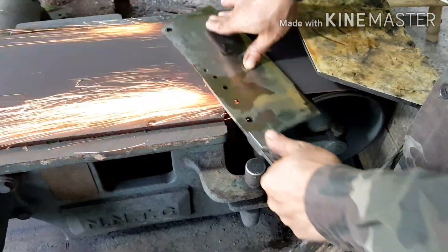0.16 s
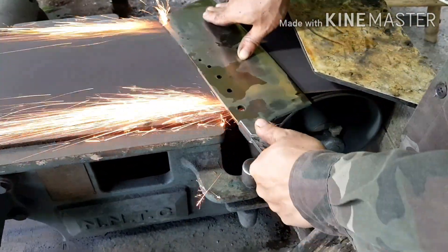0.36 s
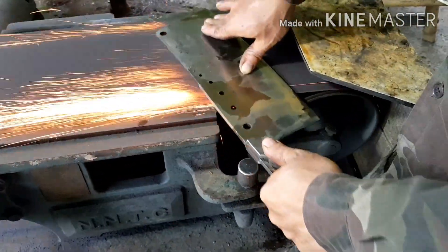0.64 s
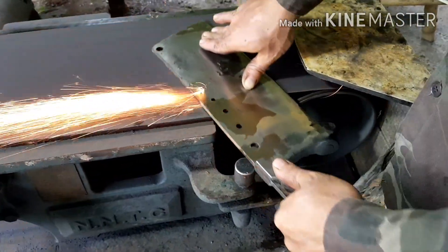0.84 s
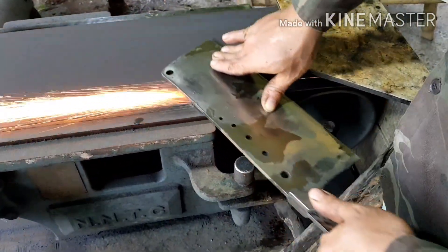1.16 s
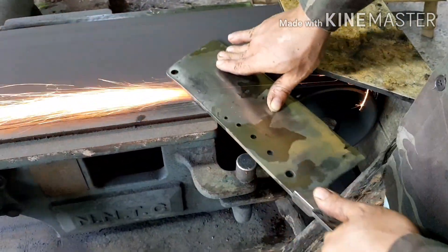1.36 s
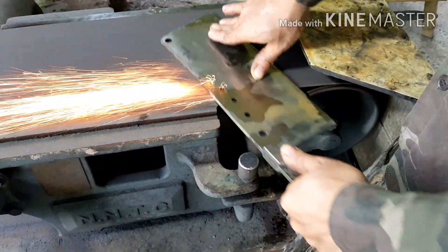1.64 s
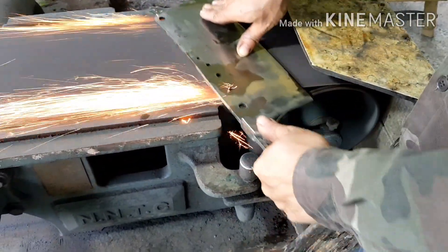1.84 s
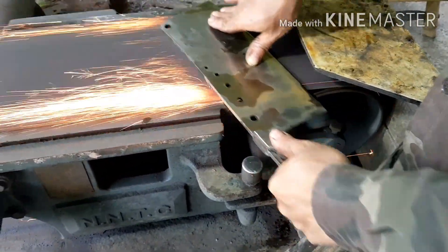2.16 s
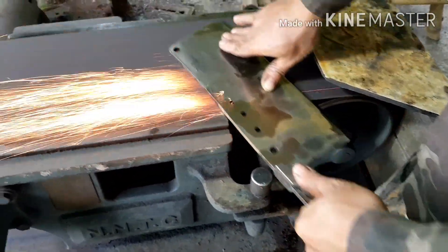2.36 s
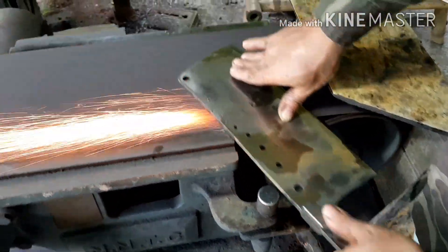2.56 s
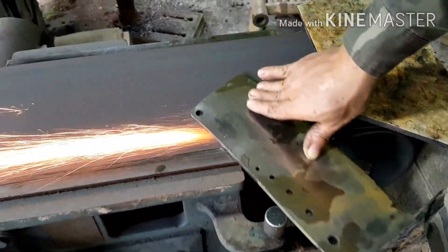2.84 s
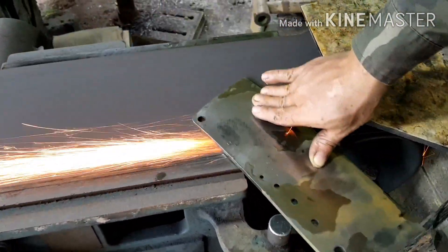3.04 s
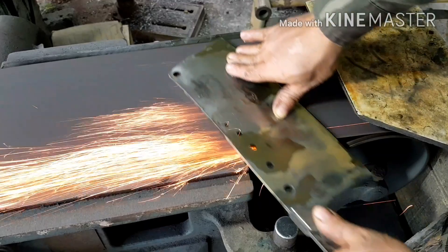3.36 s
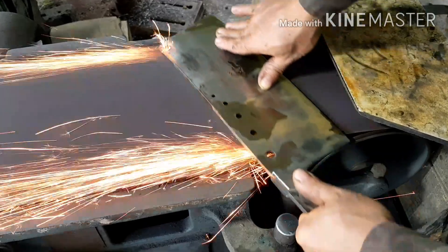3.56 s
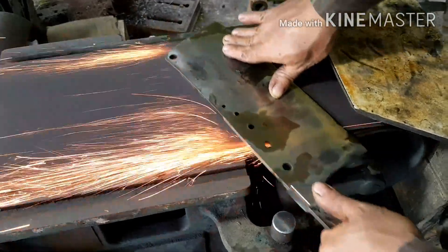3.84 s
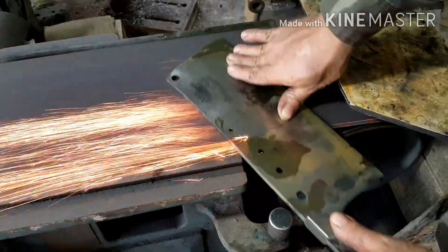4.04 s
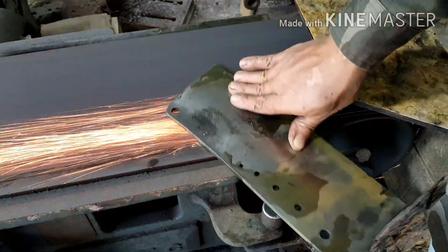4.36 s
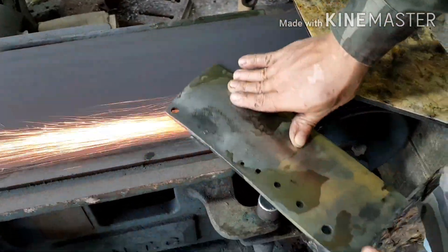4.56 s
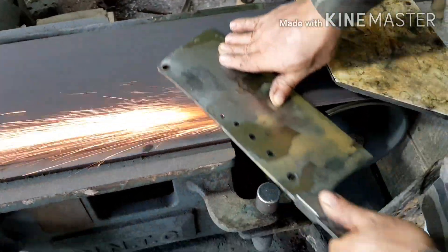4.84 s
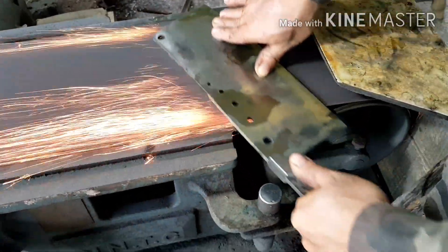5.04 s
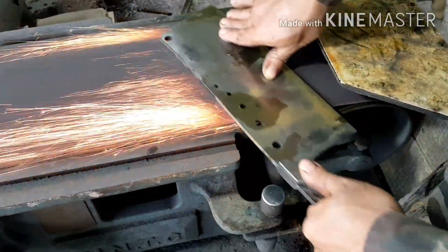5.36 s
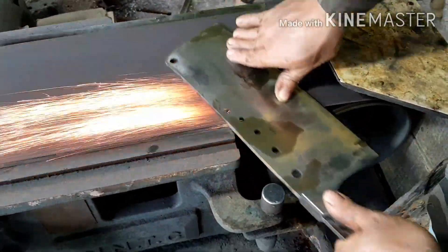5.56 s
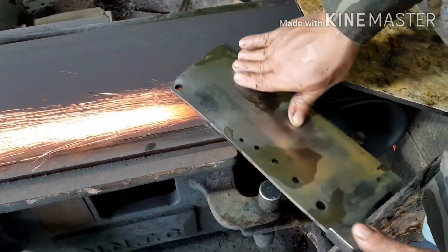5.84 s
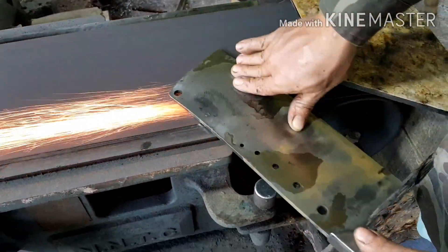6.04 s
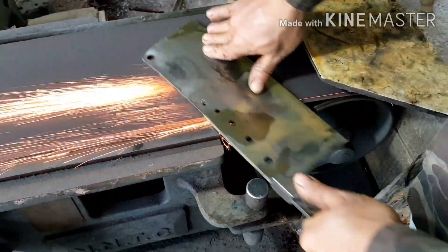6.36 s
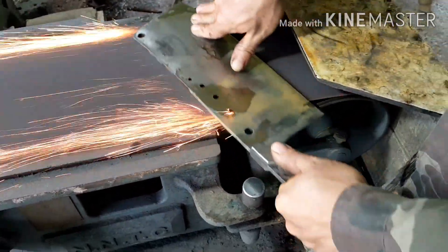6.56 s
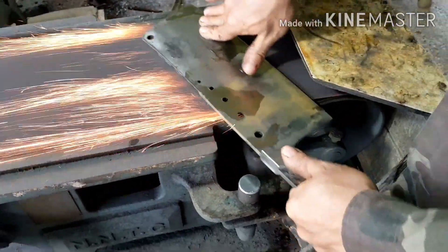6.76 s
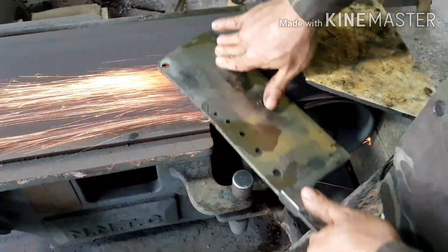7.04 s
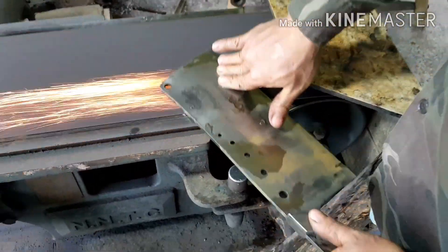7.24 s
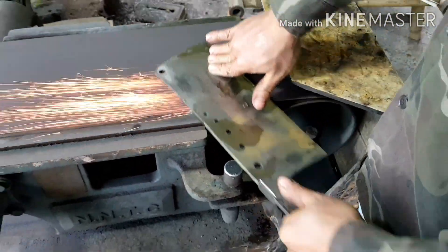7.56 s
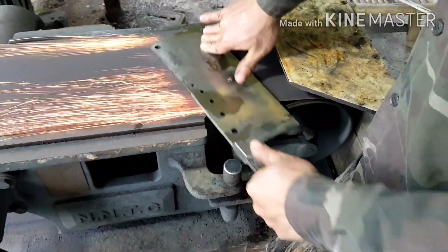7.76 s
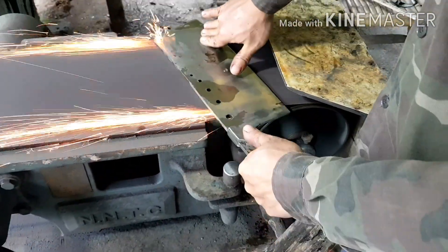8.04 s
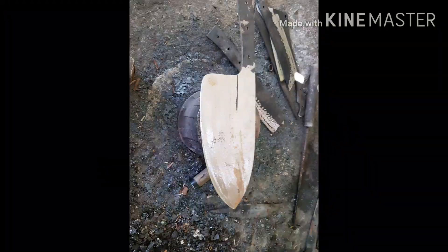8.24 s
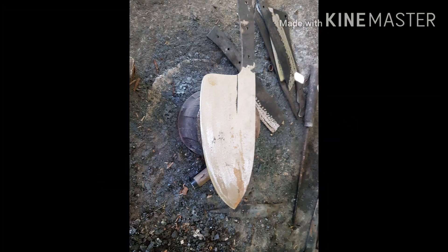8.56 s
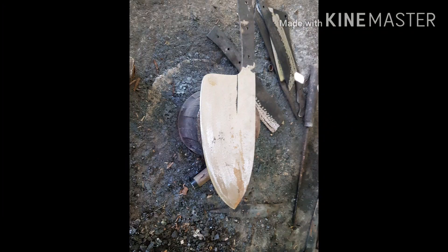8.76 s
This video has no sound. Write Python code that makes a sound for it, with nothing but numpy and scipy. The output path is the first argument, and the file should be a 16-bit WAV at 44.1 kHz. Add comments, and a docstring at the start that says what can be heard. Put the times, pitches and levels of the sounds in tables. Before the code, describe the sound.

A steel blade is stroked over a running belt grinder, alternating bright ringing screech and lower roar above steady machine hum, then everything stops dead.

```python
"""In a workshop, close to a pair of microphones, a steel blade is stroked over a grinder's running belt. It
starts with the flat down, screeching and ringing; the tip then makes the machine roar, and so to and fro.
Filtered noise, partly repeated at each turn of the drive wheel, makes the scrape throb 16 times a second.
Resonances ring and squeal; sines hum and drone below. Late on a low note groans; then the sound stops dead."""
import sys
import numpy as np
from scipy import signal
from scipy.fft import rfft, irfft, next_fast_len
from scipy.io import wavfile
from scipy.ndimage import map_coordinates

SR = 44100
rng = np.random.default_rng(int(sys.argv[2]) if len(sys.argv) > 2 else 0)


def log_audio(samples):
    """Write samples as a 16-bit WAV file to the path given in sys.argv[1]."""
    # one column per channel
    frames = np.atleast_2d(samples).T
    # limit to full scale, then quantise
    limited = np.clip(frames, -1, 1)
    pcm = np.round(limited * 32767).astype(np.int16)
    wavfile.write(sys.argv[1], SR, pcm)


N = 392483
TIME = np.arange(N) / SR  # seconds
SIZE = next_fast_len(N + 4096, real=True)
FREQ = np.fft.rfftfreq(SIZE, 1 / SR)  # Hz

# Scrape of the tip at the belt. Each row: frequency in Hz, relative density in dB per Hz.
TIP_SCRAPE = [(400, -30), (900, -10.5), (1300, 1), (1800, 0), (2250, 0), (3000, 0.5), (4000, 0.5),
              (5000, -1), (6300, -2.5), (7000, -5), (7800, -11.5), (9000, -10.5), (16000, -39.5)]
# Scrape of the flat at the belt. Each row: frequency in Hz, relative density in dB per Hz.
FLAT_SCRAPE = [(400, -29.5), (850, -21), (1150, 0), (1900, 0), (2400, -0.5), (3300, -1.1), (4400, -0.5),
               (5300, -3), (6200, -7), (7100, -11), (7700, -23), (9000, -15.5), (16000, -35)]
# Ringing of the blade lying flat. Each row: frequency in Hz, width in Hz, relative level in dB.
BLADE = [(1385, 71, -13.5), (1605, 18, -24), (1842, 50, -15.7), (2020, 130, -16), (2285, 25, -23.5),
         (2590, 130, -18.5), (3048, 28, -21.5), (3283, 120, -20.5), (3570, 45, -18.5), (3827, 50, -18.5),
         (4620, 110, -16.2), (5830, 71, -16.5), (6040, 53, -18), (7020, 70, -24), (8430, 40, -20),
         (10040, 40, -24), (11630, 22, -20), (14810, 25, -20.5)]
# Which side the lying blade beams each pitch to. Each row: frequency in Hz, left minus right in dB.
BEAM = [(900, 3.5), (1300, 3), (1800, 0.5), (2250, 2.5), (3300, -1), (4000, -1.5), (4600, -3.5), (5200, -1),
        (6500, -.5), (8000, 6), (9500, -0.5)]
# Where the scrape lies between the microphones. Each row: time in seconds, left minus right in dB.
SCRAPE_SIDE = [(0.0, -6.0), (1.44, -2.0), (1.72, -3.5), (6.08, -4.0), (6.98, 0.0), (8.22, -1.5)]
# The hand bears down on the lying blade. Each row: start in seconds, end in seconds, extra scrape in dB.
PUSHES = [(-0.04, 0.46, 4.6), (0.43, 0.72, 1.9), (1.53, 1.76, 1.5), (1.73, 2.04, 3.6), (3.26, 3.42, 7.2),
          (3.38, 3.64, 6.3), (3.55, 3.82, 3), (3.9, 4.1, 1.2), (4.84, 5.06, 3.2), (5.0, 5.26, 5.6),
          (6.27, 6.66, 3.7), (7.68, 7.86, 1.3)]
# Hiss of the grit. Each row: frequency in Hz, relative density in dB per Hz.
HISS = [(2000, -29.5), (6000, -8.5), (7200, -8), (7800, -12), (8800, -5), (10000, -.5), (11800, 1.5),
        (13000, 0), (14200, -2), (15500, -2.5)]
# How loud the grit hisses. Each row: time in seconds, level in dB.
HISS_LEVEL = [(0, -26.0), (0.42, -29.5), (0.66, -25.0), (1.3, -31.5), (1.46, -25.0), (2.2, -23.3),
              (2.6, -26.5), (3.1, -22.5), (3.24, -25.5), (3.36, -21.3), (3.46, -23), (3.54, -20.3),
              (3.74, -26.0), (4.24, -29.5), (4.56, -28.0), (4.7, -33.0), (4.92, -26.0), (5.44, -26.3),
              (5.76, -30.0), (6.46, -24.5), (6.98, -26.0), (7.12, -24.5), (7.36, -26.0), (8.22, -27.0)]
# Lower sizzle of a deep cut. Each row: frequency in Hz, relative density in dB per Hz.
SIZZLE = [(2500, -28), (5200, -2), (6500, 0), (8000, 0), (9000, -3), (12000, -20)]
SIZZLE_DB, SIZZLE_PER_HISS = -42, 2.4  # dB at the average hiss; dB per dB of hiss
RING_PER_SCRAPE, FULL_RING_DB = .2, -21  # dB of ringing per dB of scrape; scrape in dB for full ringing
BLADE_DRIFT = .0012  # share by which its resonances move as the contact slides
PUSH_LEAN = .3  # dB that the scrape leans to the right for each dB of push


def blade(force):
    """Grit tears at the steel; the more of it lies on the belt, the harder it chatters and rings."""
    roar_db, hiss_db = follow(ROAR_LEVEL), follow(HISS_LEVEL)
    push_db = sum(db * swell(start, end) for start, end, db in PUSHES)
    scrape_db = scraping(roar_db, hiss_db, push_db)
    flat = 1 / (1 + np.exp((roar_db + 9.0 - scrape_db) / 1.5))  # 0 on the tip, 1 lying flat

    bite_db = (.7 + 1.15 * flat) * force + .55 * wander(12)
    bite = amp(bite_db) * (1.5 + 0.33 * grit(per_s=160, spread_db=2.0))
    drive = unit(friction(memory=.85, repeat=0.54) * bite)

    modes = 0
    for hz, width, db in BLADE:
        modes += amp(db + 1.8 * wander(6)) * ring(drive, hz, width, BLADE_DRIFT)
    modes *= amp(RING_PER_SCRAPE * np.minimum(scrape_db - FULL_RING_DB, 0))
    lying = amp(-1.64) * colour(drive, FLAT_SCRAPE) + amp(-1.3) * modes
    lying = irfft(rfft(lying, SIZE) * pan(spectrum(BEAM)), SIZE)[:, :N]
    tip = amp(1.7) * colour(friction(memory=.8, repeat=.4) * bite, TIP_SCRAPE)
    scrape = np.sqrt(flat) * lying + np.sqrt(1 - flat) * tip
    scrape = shifting(scrape, patchy_db=2.1, span_s=.17, span_hz=59.9)
    scrape = amp(scrape_db) * snagging() * scrape

    hiss = colour(rng.standard_normal((2, N)) * bite ** 0.69, HISS)
    hiss = amp(hiss_db) * shifting(hiss, patchy_db=3.0, span_s=.09, span_hz=59.8)
    sizzle_db = SIZZLE_DB + SIZZLE_PER_HISS * (hiss_db - hiss_db.mean())
    sizzle = amp(sizzle_db) * colour(rng.standard_normal((2, N)) * bite, SIZZLE)
    side_db = follow(SCRAPE_SIDE) - PUSH_LEAN * push_db
    return pan(side_db) * scrape + pan(-.3) * (hiss + sizzle)


# Spans of stronger scrape: the flat on the belt, or, in the light rows, mostly the tip.
# Each row: start in seconds, end in seconds, scrape in dB before the push of the hand.
CONTACTS = [(-0.07, 0.86, -24.8), (1.44, 2.12, -24.5), (2.03, 3.16, -27.3), (3.19, 4.17, -22.5),
            (4.78, 5.54, -26.5), (5.76, 6.02, -30), (6.22, 7.12, -21.8), (7.6, 8.36, -24.5)]
# The tip scrapes all the time, rising with the roar and the hiss (dB at their averages; dB per dB).
TIP_DB, TIP_PER_ROAR, TIP_PER_HISS = -27.0, .36, .6


def scraping(roar_db, hiss_db, push_db):
    """Level of the scrape in dB: the steady tip, plus the spans of stronger scrape."""
    tip_db = TIP_DB + TIP_PER_ROAR * (roar_db - roar_db.mean())
    tip_db += TIP_PER_HISS * (hiss_db - hiss_db.mean())
    stronger = sum(amp(db) * contact(start, end) for start, end, db in CONTACTS)
    return 20 * np.log10(np.hypot(amp(tip_db), amp(push_db) * stronger))


def contact(start, end):
    """A span of stronger scrape sets in, stays and lets go in straight lines: 0 to 1."""
    rise_s, fall_s = .1, .12  # seconds
    return np.clip(np.minimum((TIME - start) / rise_s, (end - TIME) / fall_s), 0, 1)


# The edge snags on the belt and the blade jumps with a short rasp.
# Each row: start in seconds, peak gain in dB.
SNAGS = [(0.099, 3), (0.161, 6), (0.183, 3.5), (0.222, 7), (0.243, 3.5), (0.285, 6.5), (0.566, 4.5),
         (1.617, 4), (1.770, 3), (1.879, 4), (1.928, 4), (1.940, 4.5), (2.288, 4), (3.282, 4.5), (3.451, 3),
         (3.620, 3), (3.652, 3.5), (3.684, 4), (6.264, 4.5), (6.328, 4), (6.529, 3.5), (6.590, 4),
         (6.747, 5), (7.983, 4)]
SNAG_S = .002  # seconds from start to peak


def snagging():
    """Gain of the scrape and squeals: 1, with a quick rise and fall at every snag."""
    gain = np.ones(N)
    for start, db in SNAGS:
        near = (TIME > start) & (TIME < start + 10 * SNAG_S)
        age = (TIME[near] - start) / SNAG_S
        gain[near] += (amp(db) - 1) * age ** 2 * np.exp(2 * (1 - age))
    return gain


def chatter(top_hz):
    """The contact force jumps as high spots of the belt pass under the blade."""
    lowpass = signal.butter(2, top_hz, fs=SR, output="sos")
    return unit(signal.sosfilt(lowpass, roughness(memory=0.98, repeat=.55)))


def grit(per_s, spread_db):
    """Gain spikes of a fraction of a millisecond where single coarse grains bite."""
    struck = rng.random(N) < per_s / SR
    bites = struck * amp(spread_db * np.minimum(rng.exponential(1, N), 4))
    return signal.lfilter([1], [1, -np.exp(-1 / (.0004 * SR))], bites)


def shifting(x, patchy_db, span_s, span_hz):
    """Patches of pitch swell and fade at random: random gain on a grid."""
    z = signal.stft(x, nperseg=2048, noverlap=1536)[2]
    bins, frames = np.indices(z.shape[1:])
    knots = rng.standard_normal((1025, 400))
    place = [bins * SR / 2048 / span_hz, frames * 512 / SR / span_s]
    field = map_coordinates(knots, place, order=1, mode="mirror")
    z = z * amp(patchy_db * unit(field))
    return unit(signal.istft(z, nperseg=2048, noverlap=1536)[1][:, :N])


# One mode catches on the belt and sings.
# Each row: start in seconds, end in seconds, frequency in Hz, width in Hz, level in dB.
SQUEALS = [(0.02, 0.42, 5850, 35, -32), (0.52, 0.72, 5850, 30, -34), (0.03, 0.4, 2620, 90, -31),
           (0.5, 0.75, 2610, 40, -34), (0.14, 0.42, 4580, 110, -27), (0.11, 0.32, 4300, 200, -31.5),
           (0.15, 0.38, 3560, 90, -32), (0.03, 0.42, 1900, 120, -33), (1.78, 2.04, 5860, 30, -34),
           (1.75, 2.02, 4590, 80, -32), (2.52, 2.98, 2480, 50, -32), (2.5, 3.04, 1028, 45, -30.5),
           (2.68, 3.15, 3070, 25, -34), (3.19, 3.28, 5830, 40, -35), (3.19, 3.42, 4640, 110, -28),
           (3.27, 3.41, 3160, 110, -25.5), (3.35, 3.5, 6045, 45, -23), (3.29, 3.4, 5830, 50, -25),
           (3.44, 3.57, 5880, 80, -26), (3.4, 3.6, 3055, 30, -28), (3.55, 4.03, 5990, 90, -34),
           (3.27, 3.4, 3830, 45, -30), (3.92, 4.08, 3810, 45, -34), (3.91, 4.12, 3270, 70, -32),
           (3.85, 4.1, 2520, 50, -34), (3.91, 4.14, 4680, 60, -34), (4.02, 4.15, 5830, 30, -30),
           (4.87, 5.24, 5960, 170, -33.5), (5.04, 5.24, 1400, 90, -30.5), (5.74, 6.02, 2490, 25, -33.5),
           (6.33, 6.52, 5980, 120, -31), (6.33, 6.43, 4700, 60, -30), (6.5, 6.68, 4700, 55, -28),
           (6.73, 6.95, 4700, 50, -32), (6.8, 7.05, 6030, 30, -34), (7.6, 8.12, 5830, 35, -35),
           (7.7, 8.22, 2080, 90, -36.5), (7.8, 8.2, 4680, 50, -34)]


def squeals(force):
    """Narrow resonances that swell and fade as the blade slides, and flutter with its chatter."""
    out, flutter = np.zeros((2, N)), amp(1.2 * force) * snagging()
    for start, end, hz, width, db in SQUEALS:
        span = (TIME > start) & (TIME < end)
        level = np.sqrt(np.sin(np.pi * (TIME[span] - start) / (end - start)))
        tone = ring(rng.standard_normal(N)[span], hz, width, BLADE_DRIFT) * flutter[span]
        tone /= np.sqrt(np.average(tone ** 2, weights=level))
        # it reaches the left microphone one sample sooner
        out[:, span] += amp(db) * level * np.array([tone, np.roll(tone, 1)])
    return pan(-3.5) * out


def groan():
    """A low mode sings briefly on one steady pitch, on the last pass of the tip."""
    start, end, hz, db = 7.16, 7.6, 442, -35  # seconds, seconds, Hz, dB
    tone = np.sin(2 * np.pi * hz * TIME + .3 * wander(6))
    return amp(db) * np.sqrt(2 * swell(start, end)) * tone


# Roar of the machine bed. Each row: frequency in Hz, relative density in dB per Hz.
ROAR = [(100, -30.5), (230, -9), (400, 1), (500, 0), (630, 2.5), (810, -5), (1000, -1.5), (1150, -2.5),
        (1500, -18.5), (4000, -45)]
# Ringing of the bed under the belt. Each row: frequency in Hz, width in Hz, relative level in dB.
BED = [(554, 36, -14.5), (728, 48, -10), (861, 42, -17.5), (977, 25, -14), (1024, 55, -8)]
# How loud the bed roars. Each row: time in seconds, relative level in dB.
ROAR_LEVEL = [(0, -38.5), (0.56, -37.0), (0.84, -31.0), (1.48, -31.0), (1.96, -35.5), (2.88, -27.5),
              (3.3, -31.5), (3.52, -36.0), (5.3, -36.0), (5.94, -28.5), (6.72, -34.0), (7.0, -32),
              (7.14, -33.0), (7.3, -29), (7.54, -35.0), (8.22, -34.0)]
BED_DRIFT = .006  # share by which its resonances move as the contact slides


def bed(rub, force):
    """The blade presses the belt on the bed, which roars and rings."""
    drive = rub * amp(1.1 * force)
    modes = 0
    for hz, width, db in BED:
        modes += amp(db + 1.8 * wander(2.5)) * ring(drive, hz, width, BED_DRIFT)
    level = amp(follow(ROAR_LEVEL) + .5 * wander(7))
    return pan(0.4) * level * (amp(-1.3) * colour(drive, ROAR) + amp(-2.0) * modes)


# Motor and mains hum. Each row: frequency in Hz, relative level in dB.
HUM = [(46.1, -54), (49.8, -57.5), (92.2, -52), (113.2, -61), (165.7, -47), (190.4, -55.5), (331.6, -50.5)]
# Tones of wheel and belt. Each row: multiple of the wheel's turning rate, relative level in dB.
WHEEL_TONES = [(16, -49), (17, -56), (20, -45.5), (22, -43), (23, -56), (34, -54.5), (45, -56), (63, -48.5),
               (85, -54), (99, -53), (114, -52), (141, -54)]
# The wheel housing booms under the tip. Each row: start in seconds, end in seconds, level in dB.
BOOMS = [(0.6, 0.88, -33.5), (1.08, 1.43, -33), (2.39, 2.76, -32.5), (2.72, 3.1, -28), (3.06, 3.44, -30.5),
         (3.44, 3.78, -35.5), (4.38, 4.78, -31.5), (5.55, 6.22, -29.5), (6.6, 7.52, -34)]
# Drone of the wheel in its housing. Each row: frequency in Hz, relative density in dB per Hz.
DRONE = [(100, -40), (200, -17), (255, -2), (310, -1), (360, -5), (420, -16.5), (700, -44)]
# Rumble of the frame. Each row: frequency in Hz, relative density in dB per Hz.
RUMBLE = [(20, -32.5), (35, -18), (60, -6.5), (110, -2), (150, -3), (200, -1.5), (260, -2.5), (400, -11.5),
          (900, -51)]
# How loud the frame rumbles. Each row: time in seconds, level in dB.
RUMBLE_LEVEL = [(0, -48), (1.36, -46.5), (1.96, -43), (2.2, -46), (3.16, -42.5), (3.7, -48), (5.24, -45),
                (6.02, -46), (6.3, -41.5), (8.22, -42)]
HOUSING_DB = -40  # middle level of the housing tone between the booms


def machine(rub):
    """Motor hum, frame rumble, and the tones and drone of the wheel in its housing."""
    turns, roar_db = wheel_turns(), follow(ROAR_LEVEL)
    shake = amp(follow(RUMBLE_LEVEL))
    hum, tones = 0, 0
    for hz, db in HUM:
        phase = 2 * np.pi * (hz * TIME + rng.random()) + 0.29 * wander(5)
        hum += amp(db + 1.6 * wander(2)) * np.sin(phase)
    for multiple, db in WHEEL_TONES:
        phase = 2 * np.pi * (multiple * turns + rng.random()) + 0.7 * wander(4)
        tones += amp(db + 2.8 * wander(2.5)) * np.sin(phase)
    tones *= amp(-.5) * unit(shake) ** .55  # they grow as the frame shakes

    # the 19th multiple meets the resonance of the housing
    housing = np.sin(2 * np.pi * 19 * turns + .25 * wander(5))
    booms = sum(amp(db) * np.sqrt(swell(start, end)) for start, end, db in BOOMS)
    tones += np.hypot(amp(HOUSING_DB + 3 * wander(4)), booms * amp(1.2 * wander(5))) * housing

    drone = amp(-4.0 + roar_db) * unit(shake) ** .3 * colour(rub, DRONE)
    frame = np.sqrt(2) * hum * unit(shake) ** 0.9 + shake * colour(rub, RUMBLE)
    return pan(1.4) * (frame + np.sqrt(2) * tones + drone)


def wheel_turns():
    """Turns of the drive wheel since the start; it slows a little in the spans of stronger scrape."""
    wheel_hz, sag_hz = 16.195, .025  # turns per second: free, and lost under load
    load = sum(contact(start, end) for start, end, _ in CONTACTS)
    return np.cumsum(wheel_hz - sag_hz * load) / SR


def roughness(memory, repeat):
    """Noise of which a share returns with every turn of the wheel, slowly wearing into a new pattern."""
    memory, repeat = np.clip([memory, repeat], 0, .98)
    per_turn = round(SR / 16.18)  # pattern samples in one turn
    pattern = rng.standard_normal((200, per_turn))
    pattern[1:] *= np.sqrt(1 - memory ** 2)
    pattern = signal.lfilter([1], [1, -memory], pattern, axis=0).ravel()
    passing = pattern[(wheel_turns() * per_turn).astype(int)]
    return np.sqrt(repeat) * passing + np.sqrt(1 - repeat) * rng.standard_normal(N)


# How alike the two microphones hear the rubbing. Each row: frequency in Hz, likeness from 0 to 1.
LIKENESS = [(60, 0.95), (320, .96), (450, .8), (650, 0.29), (1000, 0.42), (1400, 0.54), (3000, 0.21),
            (6000, 0), (15000, 0.016)]


def friction(memory, repeat):
    """Rubbing noise at two microphones: alike in the bass, unrelated in the treble."""
    left, other = (rfft(roughness(memory, repeat), SIZE) for _ in range(2))
    same = np.clip(spectrum(LIKENESS), -1, 1)
    right = same * left + np.sqrt(1 - same ** 2) * other
    return irfft([left, right], SIZE)[:, :N]


def ring(x, hz, width_hz, drift):
    """One resonance that drifts about its pitch, to rms 1: a one-pole filter turning at that pitch."""
    r = np.exp(-np.pi * width_hz / SR)
    cycles = np.cumsum(hz * (1 + drift * wander(9)[:x.shape[-1]])) / SR
    turn = np.exp(2j * np.pi * (cycles % 1))
    return unit((turn * signal.lfilter([1 - r], [1, -r], x * turn.conj())).real)


def wander(rate_hz):
    """Slow chance of rms 1, up to about the given rate."""
    knots = rng.standard_normal(4096)
    return unit(np.interp(TIME * 2 * rate_hz, np.arange(len(knots)), knots))


def swell(start, end):
    """A rounded rise and fall, from 0 to 1 and back."""
    return np.maximum(np.sin(np.pi * np.clip((TIME - start) / (end - start), 0, 1)), 0)


def follow(rows):
    """Joins rows of time and value into a curve, sample by sample."""
    return np.interp(TIME, *np.transpose(rows))


def spectrum(points):
    """Joins points on a log-frequency axis."""
    hz, value = np.transpose(points)
    return np.interp(np.log(FREQ + 1), np.log(hz + 1), value)


def colour(x, points):
    """Filters by a spectrum in dB, to rms 1."""
    return unit(irfft(rfft(x, SIZE) * amp(spectrum(points)), SIZE)[..., :N])


def pan(db):
    """Left and right gains of equal total power, from left minus right in dB."""
    sides = np.array([amp(db / 2), amp(-db / 2)]).reshape(2, -1)
    return sides / np.sqrt(np.mean(sides ** 2, 0))


def amp(db):
    """Decibels to gain."""
    return 10 ** (np.asarray(db) / 20)


def unit(x):
    """Scales to rms 1."""
    return x / np.sqrt(np.mean(x ** 2) + 1e-20)


def scene():
    """All sources, up to the sudden stop."""
    stop_s, fade_s = 8.243, .0015  # seconds: start and time constant of the stop
    rub, force = friction(memory=.88, repeat=0.53), chatter(top_hz=220)
    bed_rub = friction(memory=0.88, repeat=.57)
    left, right = blade(force) + groan() + bed(bed_rub, force) + machine(rub)
    # the left microphone is a little nearer
    sound = np.array([left, np.roll(right, 1)]) + squeals(force)
    return sound * np.exp(-np.maximum(TIME - stop_s, 0) / fade_s)


def record(dry):
    """The microphone rounds off the highest peaks; then the band limit."""
    edge_hz = 15550
    rounded = dry / (1 + (dry / .9) ** 6) ** (1 / 6)
    lowpass = signal.firwin(511, edge_hz, window=("kaiser", 9), fs=SR)
    return signal.oaconvolve(rounded, lowpass[None], "same", axes=1)


dry = scene()
out = record(dry)
log_audio(out)
```